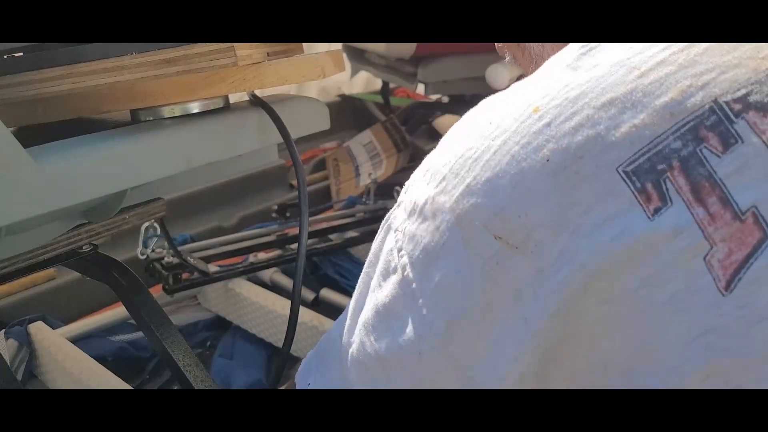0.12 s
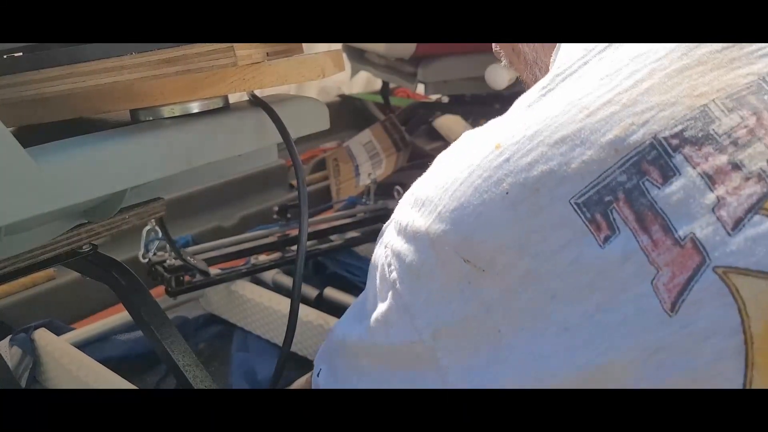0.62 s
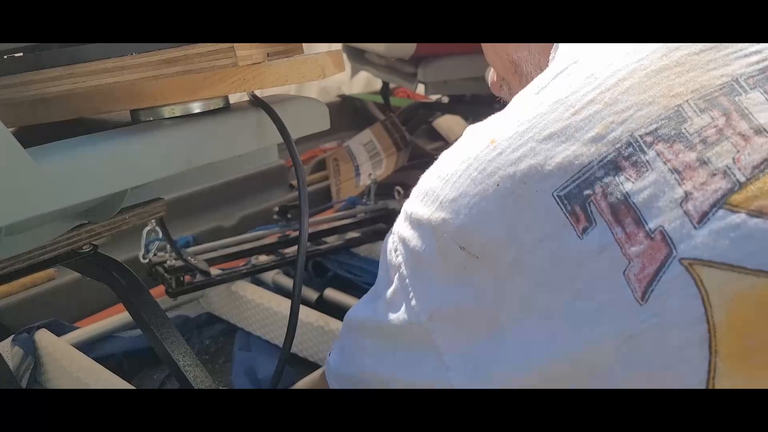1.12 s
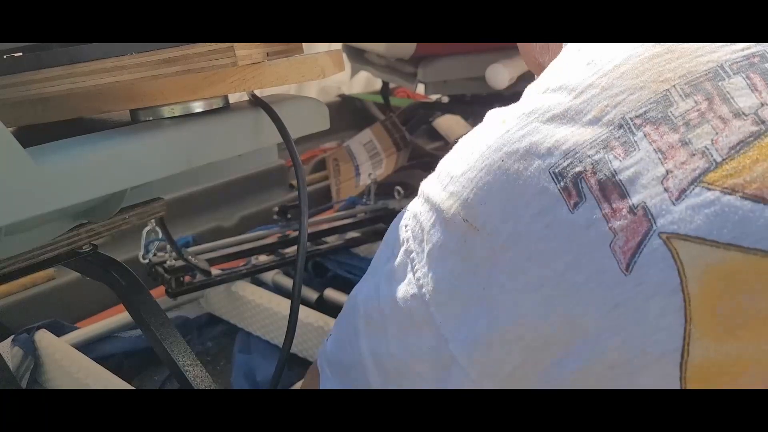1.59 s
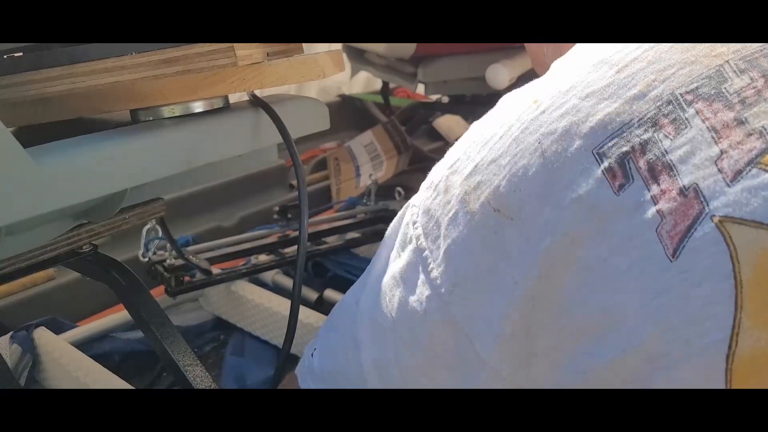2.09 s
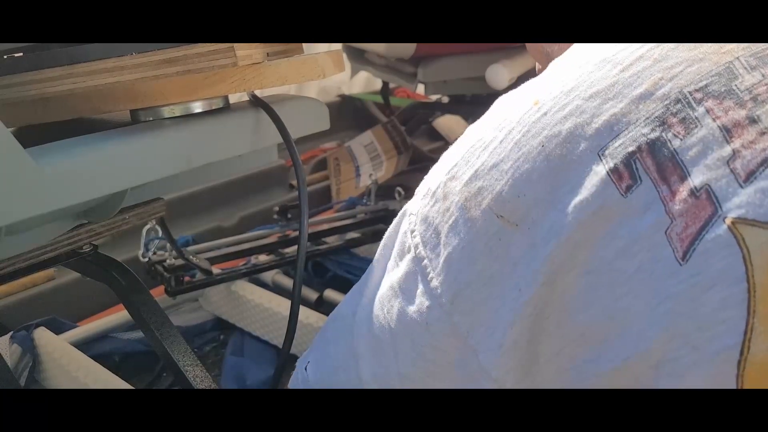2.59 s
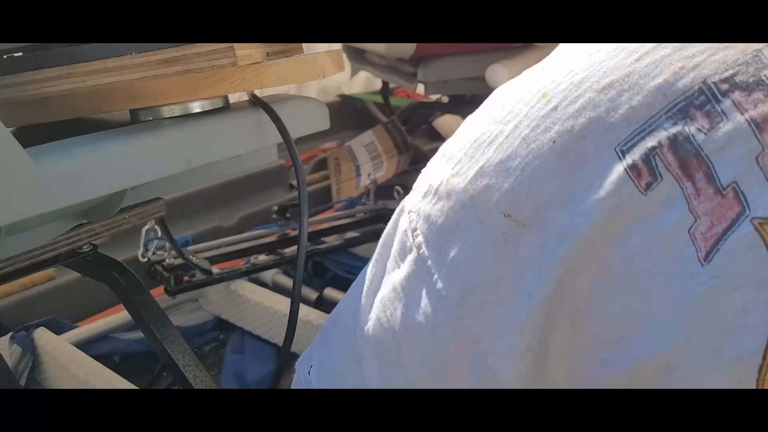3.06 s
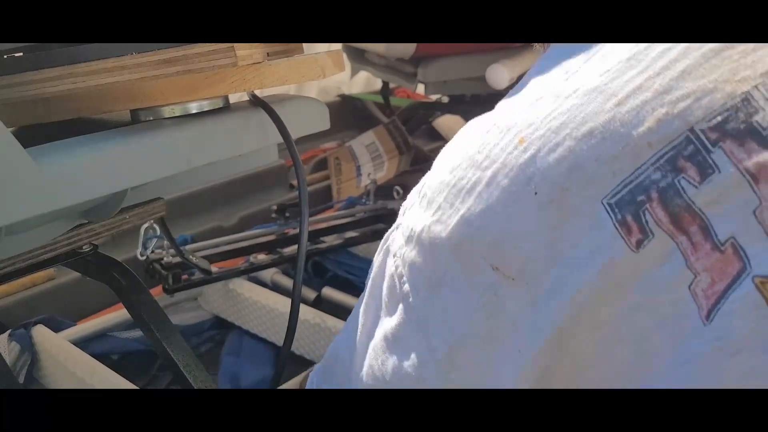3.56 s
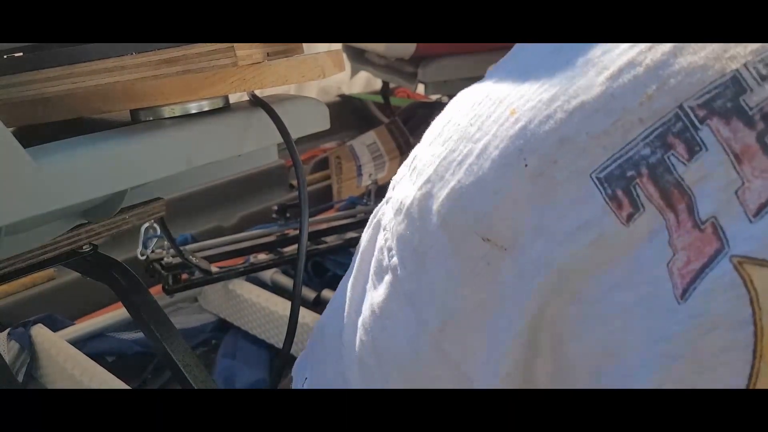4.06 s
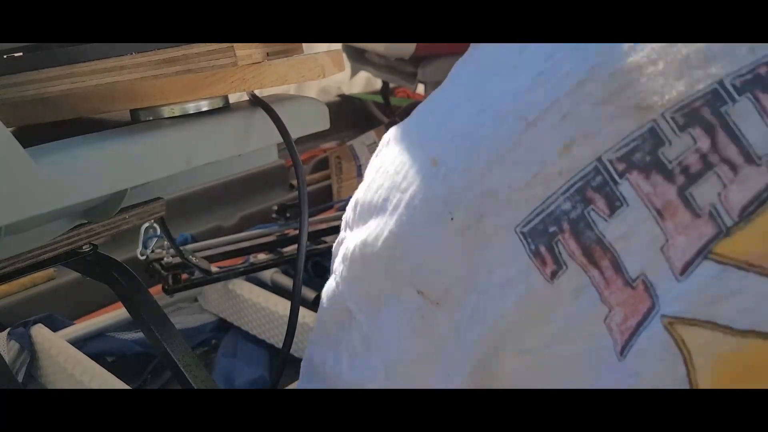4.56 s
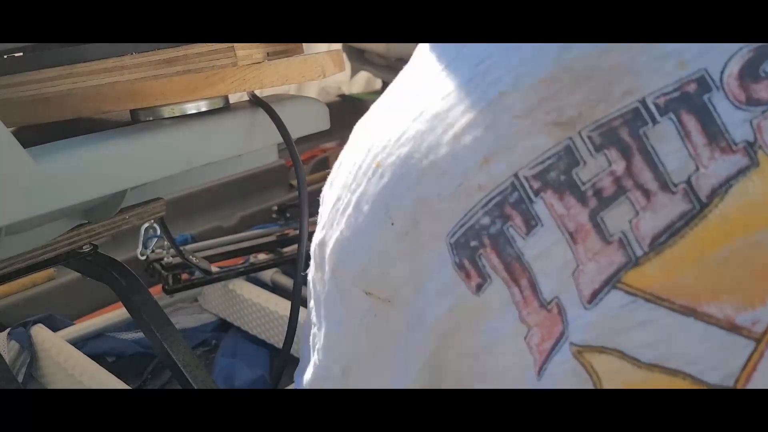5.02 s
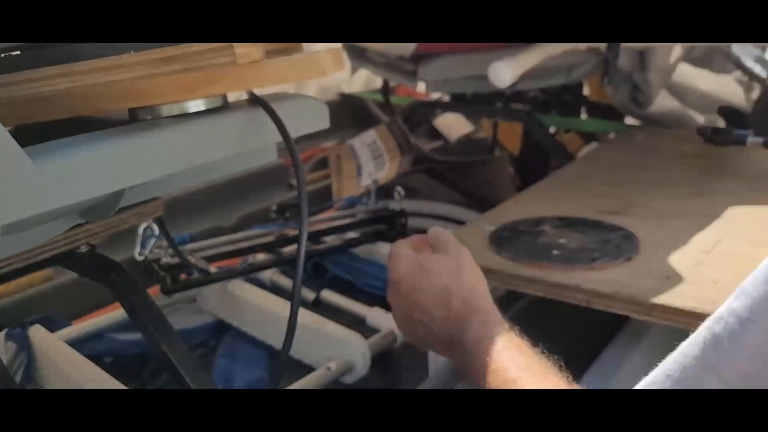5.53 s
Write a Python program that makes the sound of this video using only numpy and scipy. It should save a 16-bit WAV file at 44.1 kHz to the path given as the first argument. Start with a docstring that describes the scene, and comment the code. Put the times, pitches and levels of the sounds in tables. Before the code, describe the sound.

Close stereo sound of somebody shifting a wooden board over a hollow boat frame: two rough, low rubbing drags separated by soft bumps, quiet rocking, then one loud dry clack followed by a busy scraping and knocking move. Tiny metal fittings tick. The last second or so is nearly still, with distant insects and faint outdoor air.

```python
"""Plywood board on a small boat

On a still summer day a board is dragged, knocked and shifted over the frame of a boat, near a stereo camera.
Random slips (rubbing) and short pushes (blows) ring the hull, the frame, the board and its rough faces.
A metal fitting clinks when tapped. Behind lie a far insect chorus, made of bands of noise,
and soft outdoor air, made of coloured noise.
"""
import sys
import numpy as np
from scipy import signal
from scipy.fft import rfft, irfft
from scipy.io import wavfile
from scipy.ndimage import uniform_filter1d

SR = 44100
rng = np.random.default_rng(int(sys.argv[2]) if len(sys.argv) > 2 else 0)


def dump_mix(stems):
    """Bounce the given channels to the path in sys.argv[1] as a 16-bit WAV at rate SR."""
    frames = np.atleast_2d(stems).T  # one column per channel
    limited = np.clip(frames, -1, 1)  # hard clip at full scale
    pcm = np.round(limited * 32767).astype(np.int16)
    wavfile.write(sys.argv[1], SR, pcm)


def level_to_linear(level):
    """Convert decibel levels to linear amplitude factors, elementwise."""
    exponent = np.asarray(level, float) / 20
    return 10 ** exponent


N = 249164  # length in samples

# crowds of singing insects: (f/Hz, width/Hz, level/dB, left minus right/dB)
INSECTS = [(2880, 95, -74, -4.5), (3261, 260, -66, 4.5), (3440, 570, -66, -1), (3768, 51, -68.5, -0.5),
           (3876, 500, -68, 11), (4240, 570, -68.5, 3.5), (7440, 1600, -73.5, 1.5),
           (8330, 1270, -72.5, -9.5)]
# colour of the outdoor air: (f/Hz, relative level/dB)
AIR_COLOUR = [(15, -28), (25, -1), (108, 0.5), (195, -4), (249, 0), (476, -7), (1190, -12), (1330, -14),
              (2480, -14.5), (3820, -22), (5000, -15), (8590, -23), (16000, -35.5)]
# likeness of left and right: (f/Hz, share from 0 to 1)
ALIKE = [(60, 0.79), (300, 0.91), (640, 0.42), (950, 0.06), (1400, 0.), (16000, 0.03)]
# ringing modes of each body: (f/Hz, relative level/dB, time to fade by 60 dB/s)
HULL_MODES = [(53.6, 5, 0.12), (63, 0.5, 0.28), (81.3, -0.5, 0.17)]
FRAME_MODES = [(93, -2, 0.11), (117.6, 2, 0.17), (145.5, -1.5, 0.19), (175.3, -4.5, 0.14)]
BOARD_MODES = [(203.5, -0.5, 0.051), (258.1, 1, 0.089), (284, 0, 0.15), (313.3, 6.5, 0.059),
               (367.7, -2, 0.069), (387.3, -5, 0.096), (437.5, -9, 0.076), (489.3, -6, 0.061)]
FACE_MODES = [(564, 2.5, 0.075), (656, -3, 0.068), (764, 3.5, 0.046), (870, -4.5, 0.038), (1075, 0, 0.035),
              (1200, -5.5, 0.066), (1377, 3.5, 0.019), (1610, -6, 0.022), (1714, -1, 0.046),
              (1900, -58, 0.028), (2220, -11, 0.065), (2415, -4.5, 0.053), (2180, -26, 0.066),
              (2680, -15, 0.13), (3300, -2, 0.027), (3263, 2.5, 0.035), (3930, -3, 0.036)]
FITTING_MODES = [(5230, -4, 0.062), (6300, -13, 0.03), (7200, 7.5, 0.012), (8980, -13.5, .025),
                 (10300, -10.5, 0.03), (11200, -13, 0.036), (12600, -19, .025), (14700, -11, 0.039)]
# colours of the rough faces, from coarse to fine, and of the crack of a blow: (f/Hz, relative level/dB)
RASP_COLOUR = [(300, -26), (480, -4.5), (750, -2.5), (980, -0.5), (1250, -1.5), (1600, -13), (2200, -15.5),
               (4000, -40.5)]
SCRATCH_COLOUR = [(900, -6), (1450, -1.5), (1900, -4), (2600, -6), (3800, -11), (5000, -24), (7000, -39.5)]
GRIT_COLOUR = [(2500, -10), (4500, 2.5), (7500, 3), (9500, -8.5), (12000, -5.5), (15000, -19), (16000, -48)]
CRACK_COLOUR = [(2500, -9), (4500, -1), (7500, 4), (9500, -20), (12000, -30), (16000, -31)]
# the board dragged or rocked, one list per move:
# (t/s, board force/dB, bass force through the boat/dB, rasp force/dB, grit force/dB)
DRAGS = [
    [(0.15, -56, -51, -80, -69), (0.21, -39, -48, -53, -59), (0.252, -39.5, -38, -51, -66),
     (0.28, -36, -41.5, -46, -59.5), (0.4, -30, -33.5, -38, -58), (0.53, -33, -39, -45.5, -59.5),
     (0.708, -29.5, -39.5, -34.5, -54), (0.728, -26, -35, -36.5, -48), (0.748, -45, -34.5, -39, -43.5),
     (0.77, -38.5, -35, -42, -50), (0.796, -48, -49, -63, -62), (0.844, -60, -53, -67, -78),
     (0.89, -55, -53, -74, -85)],
    [(1.57, -72, -75, -75, -79), (1.698, -33.5, -41, -41.5, -54), (1.754, -30.5, -38, -39.5, -58.5),
     (1.796, -31.5, -28.5, -37, -55), (1.886, -30, -33.5, -35.5, -48.5), (1.9, -32.5, -32, -35, -53),
     (1.936, -30, -43, -34.5, -53.5), (1.952, -33, -31.5, -40.5, -61), (1.974, -30.5, -34.5, -43, -58.5),
     (2.03, -35.5, -36, -47, -59), (2.052, -45, -42, -52, -63), (2.11, -59, -46.5, -76, -65),
     (2.14, -65, -60, -76, -70)],
    [(3.09, -41.5, -38, -42, -79), (3.11, -54, -40, -75, -78), (3.14, -51, -40, -60, -72),
     (3.17, -39, -35.5, -52.5, -55), (3.188, -43, -40, -55, -64), (3.208, -46, -34, -61.5, -66),
     (3.232, -43.5, -43, -60, -69), (3.254, -58, -59, -77, -69), (3.27, -60, -52, -71, -65),
     (3.282, -58, -54, -84, -76), (3.29, -59, -57, -72, -78), (3.324, -67, -63, -84, -77),
     (3.38, -93, -72, -84, -82)],
    [(3.48, -65, -58, -76, -82), (3.528, -57, -39, -76, -73), (3.556, -38.5, -33.5, -38.5, -68),
     (3.614, -28.5, -33, -36, -55), (3.628, -31.5, -27, -40.5, -41.5), (3.672, -28.5, -29, -37.5, -62),
     (3.748, -32.5, -33.5, -42, -56), (3.88, -41, -46, -49, -60.5), (3.922, -48.5, -47, -60, -66),
     (3.972, -54, -40.5, -51.5, -61), (4.03, -44.5, -54.5, -52.5, -55.5), (4.072, -60, -55, -69, -77),
     (4.12, -77, -61, -86, -74)],
]
# where the board rests in each drag: (share of the bass in the hull/dB, in the frame/dB, scratch offset/dB)
RESTS = [(-7.5, -1, 2), (-5, -1.5, 3), (-4, -4.5, -1), (-3.5, -2.5, -1.5)]
# short shoves and rocking of the boat: (t/s, hold/s, hull force/dB, frame force/dB, board force/dB)
SHOVES = [(0.05, 0.043, -49, -47.5, -52.5), (1.041, 0.016, -46, -40, -47.5), (1.182, 0.021, -55, -76, -62),
          (1.322, 0.011, -74, -50, -55), (1.383, 0.026, -58, -64, -59.5), (2.149, 0.038, -45.5, -66, -58.5),
          (2.254, .04, -50, -63, -62.5), (2.336, 0.025, -53, -72, -70), (2.415, .03, -45, -58, -69),
          (2.473, 0.011, -55, -68, -70), (3.049, 0.0094, -35, -40.5, -37), (4.15, 0.0092, -41, -46, -47),
          (4.24, 0.061, -62, -59, -63.5), (4.352, 0.029, -56.5, -57, -52), (4.402, 0.039, -52.5, -58, -61),
          (4.733, .02, -60, -63, -61), (4.888, 0.015, -70, -71, -58.5), (1.427, 0.015, -61, -64, -68),
          (2.214, .02, -47, -62, -79)]
# blows: (t/s, face push/dB, board push/dB, hull and frame push/dB, pitch the struck spot favours f/Hz)
KNOCKS = [(.067, -40, -31, -44, 880), (0.078, -60, -49, -61, 690), (0.203, -46, -35, -38, 870),
          (1.058, -50, -33.5, -55, 850), (1.203, -51.5, -60, -52, 786), (1.322, -40.5, -32, -40, 1090),
          (3.057, -17.5, -16, -33, 1490), (3.091, -40.5, -43, -50, 1200), (3.133, -41, -55, -50, 1250),
          (3.184, -50, -55, -51, 800), (3.552, -31, -26.5, -23, 1140), (3.566, -42, -47, -28, 2200),
          (3.579, -28, -45, -42, 1370), (3.705, -36.5, -26, -32, 1280), (3.833, -34.5, -47, -39, 930),
          (3.939, -48, -35.5, -43, 800), (3.964, -43, -56, -59, 1900), (4.001, -33.5, -45, -62, 2160),
          (4.024, -39.5, -35, -57, 1500), (4.165, -30.5, -26, -38, 1580), (4.359, -39.5, -43, -51, 1200),
          (4.742, -54, -65, -55, 850), (4.912, -50, -47, -73, 800)]
# taps on the metal fitting: (t/s, tap strength/dB)
CLINKS = [(1.787, -36), (1.8906, -38), (1.926, -35), (3.172, -44), (3.626, -23), (3.6394, -46),
          (4.023, -39)]

EARS = np.array([[1], [-1]])  # left, right
AIR_DB = -60
SHOVE_ATTACK_S, SHOVE_RELEASE_DB_PER_S = 0.0062, 305
SHOVE_RASP_DB, SHOVE_GRIT_DB = -10, -15.5  # relative to the board
# the scratch force lies between rasp and grit: share of the rasp, and offset in a shove
SCRATCH_SHARE, SHOVE_SCRATCH_DB = 0.59, 4
RATTLE_T60_S = 0.05
SPOT_DB_PER_OCTAVE = 8  # loss of a face mode away from the pitch of the struck spot
GROUP_BINS = 40  # width of a group of dense modes, in steps of 4 Hz
LOW_HZ, TOP_HZ = 41.8, 15700


def unit(x):
    """Scale to energy 1 per channel, averaged over the channels."""
    return x / np.sqrt(np.mean(np.sum(x ** 2, axis=-1)))


def walk(rate):
    """Random levels held 1 / rate s, then smoothed twice; typical spread 0.57."""
    k = int(SR / rate)
    steps = np.repeat(rng.standard_normal(N // k + 1), k)
    return 0.77 * uniform_filter1d(uniform_filter1d(steps, k), k)[:N]


def insects():
    """Each crowd is noise in one resonance, unrelated left and right, its level gently flickering."""
    hz_bins = np.fft.rfftfreq(N, 1 / SR)
    out = 0
    for hz, width, db, pan_db in INSECTS:
        resonance = 1 / (1 + (2 * (hz_bins - hz) / width) ** 2)
        band = irfft(rfft(rng.standard_normal((2, N))) * resonance, N)
        level = level_to_linear(db + EARS * pan_db / 2 + 0.5 * walk(2.68) + 0.94 * walk(24.95))
        out = out + level * unit(band) * np.sqrt(N)
    return out


def curve(points, size):
    """Read a (Hz, value) table at every bin of a transform."""
    hz, value = np.transpose(points)
    return np.interp(np.log(np.fft.rfftfreq(size, 1 / SR) + 1), np.log(hz), value)


def stereo_noise(colour, size):
    """Coloured noise, alike left and right in the bass, almost unrelated in the treble."""
    alike = np.clip(curve(ALIKE, size), -1, 1)
    mid, side = rfft(rng.standard_normal((2, size)))
    both = np.sqrt(1 + alike) * mid + EARS * np.sqrt(1 - alike) * side
    return unit(irfft(level_to_linear(curve(colour, size)) * both, size))


def air():
    """Distant outdoor murmur of air and water: coloured noise, swelling gently."""
    return level_to_linear(AIR_DB + 0.57 * walk(3.03)) * stereo_noise(AIR_COLOUR, N) * np.sqrt(N)


def ring(modes):
    """Response of damped modes that swing up in about a cycle; neighbours alternate in sign and leading ear."""
    t = np.arange(SR // 2) / SR
    alike_hz, share = np.transpose(ALIKE)
    out = 0
    for k, (hz, db, t60) in enumerate(modes):
        sign = (-1) ** k
        # the less alike the ears are, the further apart their phases
        lead = np.arccos(np.clip(np.interp(hz, alike_hz, share), -1, 1)) / 2
        swell = (1 - np.exp(-4.0 * hz * t)) ** 2
        swing = np.sin(2 * np.pi * hz * t + sign * EARS * lead)
        out = out + sign * swell * level_to_linear(db - 60 * t / t60) * swing
    return unit(out)


def dense_ring(colour, t60, rise):
    """Response of modes too dense to count: a puff of noise that swells and fades, its colour even."""
    t = np.arange(SR // 4) / SR
    fade = (1 - np.exp(-t / rise)) ** 2 * level_to_linear(-60 * t / t60)
    puff = rng.standard_normal(len(t)) * fade
    # overlapping modes fill each other's gaps, so no pitch stands out from the colour
    for _ in range(3):
        bins = rfft(puff)
        even = irfft(level_to_linear(curve(colour, len(t))) * bins / np.abs(bins), len(t))
        puff = even * np.sqrt(fade)
    # each group of modes leads in one ear or the other, the more so the less alike the ears are
    leading_ear = rng.choice([-1, 1], len(bins) // GROUP_BINS + 1)
    leading_ear = np.repeat(leading_ear, GROUP_BINS)[:len(bins)]
    lead = leading_ear * np.arccos(np.clip(curve(ALIKE, len(t)), -1, 1)) / 2
    stereo = irfft(rfft(puff) * np.exp(1j * EARS * lead), len(t))
    return unit(stereo * fade ** 0.25)


def excite(force, response):
    """The force heard through a stereo response."""
    return signal.fftconvolve(force[None], response, axes=1)[:, :N]


def grains(rate, spread_db):
    """Slips at random moments (rate per second), of uneven strength; rms 1."""
    happens = rng.random(N) < rate / SR
    slips = happens * rng.standard_normal(N) * level_to_linear(spread_db * rng.exponential(size=N))
    return slips / np.std(slips)


def friction():
    """Gains of the rubbing force on board, hull, frame, rasp, scratch and grit; nil between moves."""
    t = np.arange(N) / SR
    gain = np.zeros((6, N))

    def parts(board, hull, frame, rasp, grit, scratch_db):
        """Turn the six levels into gains; the scratch follows from rasp and grit."""
        scratch = scratch_db + SCRATCH_SHARE * rasp + (1 - SCRATCH_SHARE) * grit
        return level_to_linear(np.array([board, hull, frame, rasp, scratch, grit]))

    for drag, (hull_db, frame_db, scratch_db) in zip(DRAGS, RESTS):
        rows = np.array(drag)
        on = (t >= rows[0, 0]) & (t <= rows[-1, 0])
        board, bass, rasp, grit = (np.interp(t[on], rows[:, 0], rows[:, k]) for k in range(1, 5))
        gain[:, on] += parts(board, bass + hull_db, bass + frame_db, rasp, grit, scratch_db)

    for s, hold, hull_db, frame_db, board_db in SHOVES:
        on = (t >= s) & (t < s + 0.5)
        age = t[on] - s
        attack = np.minimum(age / SHOVE_ATTACK_S, 1)
        release = level_to_linear(-SHOVE_RELEASE_DB_PER_S * np.maximum(age - SHOVE_ATTACK_S - hold, 0))
        peak = parts(board_db, hull_db, frame_db, board_db + SHOVE_RASP_DB,
                     board_db + SHOVE_GRIT_DB, SHOVE_SCRATCH_DB)
        gain[:, on] += peak[:, None] * attack * release
    return uniform_filter1d(gain, size=200, axis=1)


def rubbing():
    """Slips judder together in all parts: coarse ones ring the bodies, coarse and fine the rough faces."""
    judder = level_to_linear(0.57 * walk(29) + 1.98 * walk(45))
    slips = judder * grains(2200, 1.02)
    fine = judder * grains(5000, 0.76)
    board, hull, frame, rasp, scratch, grit = friction()
    out = excite(board * slips, ring(BOARD_MODES))
    out = out + excite(hull * slips, ring(HULL_MODES))
    out = out + excite(frame * slips, ring(FRAME_MODES))
    # the lower face modes sing faintly through the rasp
    out = out + level_to_linear(-4.0) * excite(rasp * fine, ring(FACE_MODES[:7]))
    # two contact patches, one per kind of grain, each heard its own way
    for grain in (slips, fine):
        out = out + excite(rasp * grain, dense_ring(RASP_COLOUR, 0.054, 0.00048)) / np.sqrt(2)
        out = out + excite(scratch * grain, dense_ring(SCRATCH_COLOUR, 0.086, 0.0001)) / np.sqrt(2)
        out = out + excite(grit * grain, dense_ring(GRIT_COLOUR, 0.13, 0.00058)) / np.sqrt(2)
    return out


def blows(rows, column, rattle_share):
    """Each blow is one push together with a short fading rattle."""
    force, t = np.zeros(N), np.arange(4000) / SR
    for row, rattle in zip(rows, rng.standard_normal((len(rows), len(t)))):
        burst = rattle_share * unit(rattle * level_to_linear(-60 * t / RATTLE_T60_S))
        burst[0] += 1
        at = int(row[0] * SR)
        force[at:at + len(t)] += level_to_linear(row[column]) * burst
    return force


def knocks():
    """A blow rings every body; on the face it favours the modes of the struck spot, with a brief crack."""
    # slow modes spread a push over more time, so they take a larger one for the same peak
    out = level_to_linear(22.5) * excite(blows(KNOCKS, column=3, rattle_share=0.99), ring(HULL_MODES + FRAME_MODES))
    out = out + level_to_linear(15.5) * excite(blows(KNOCKS, column=2, rattle_share=0.9), ring(BOARD_MODES))
    # crack, then scratch, both following the push on the face
    crack = blows(KNOCKS, column=1, rattle_share=2.6)
    out = out + level_to_linear(-9.5) * excite(crack, dense_ring(CRACK_COLOUR, 0.073, 0.00015))
    scratch = blows(KNOCKS, column=1, rattle_share=1.8)
    out = out + level_to_linear(9) * excite(scratch, dense_ring(SCRATCH_COLOUR, 0.036, 0.000047))
    for s, face_db, _, _, spot_hz in KNOCKS:
        spot = [(hz, db - SPOT_DB_PER_OCTAVE * abs(np.log2(hz / spot_hz)), t60)
                for hz, db, t60 in FACE_MODES]
        at = int(s * SR)
        # the face answers 0.44 ms late
        push = blows([(0.00044, face_db)], column=1, rattle_share=0.17)[:4000]
        sound = signal.fftconvolve(push[None], ring(spot)[:, :8000], axes=1)
        out[:, at:at + sound.shape[1]] += level_to_linear(17.0) * sound
    return out


def fitting():
    """Tiny taps ring a loose metal part, each tap a very short fading rattle."""
    taps, t = np.zeros(N), np.arange(600) / SR
    for (s, db), bounce in zip(CLINKS, rng.standard_normal((len(CLINKS), len(t)))):
        at = int(s * SR)
        taps[at:at + len(t)] += level_to_linear(db) * unit(bounce * level_to_linear(-60 * t / 0.013))
    return level_to_linear(11.0) * excite(taps, ring(FITTING_MODES))


def scene():
    """Chorus and air behind, boat work in front."""
    return insects() + air() + rubbing() + knocks() + fitting()


def low_pass(x):
    """Removes everything above the highest recorded frequency."""
    return signal.sosfilt(signal.butter(12, 16450, fs=SR, output="sos"), x)


def record(dry):
    """The microphones roll off the deep bass and the camera cuts the top."""
    low_cut = signal.butter(2, LOW_HZ, "high", fs=SR, output="sos")
    top_cut = signal.ellip(8, 0.2, 60, TOP_HZ, fs=SR, output="sos")
    mix = signal.sosfilt(top_cut, signal.sosfilt(low_cut, dry))
    return low_pass(mix)


dry = scene()
out = record(dry)
dump_mix(out)
```